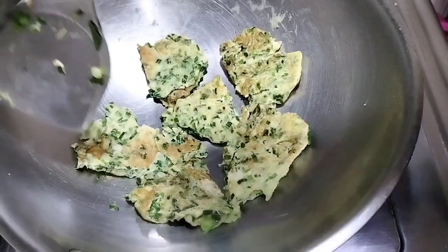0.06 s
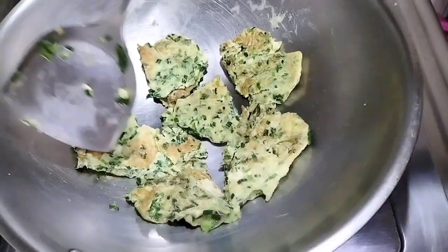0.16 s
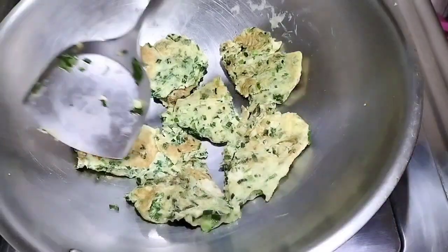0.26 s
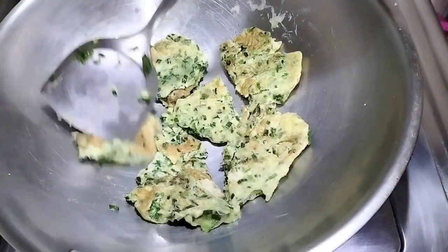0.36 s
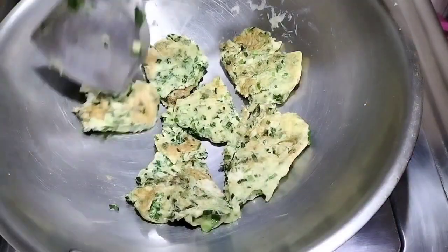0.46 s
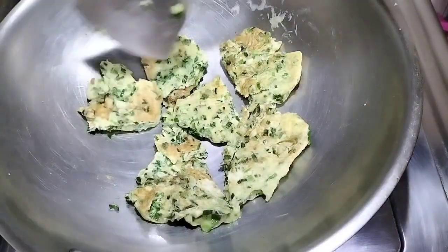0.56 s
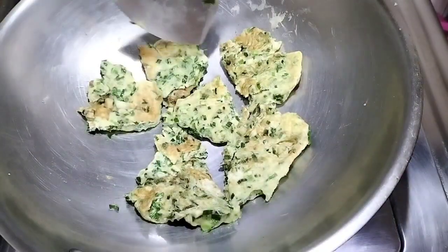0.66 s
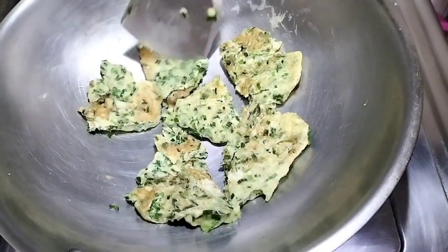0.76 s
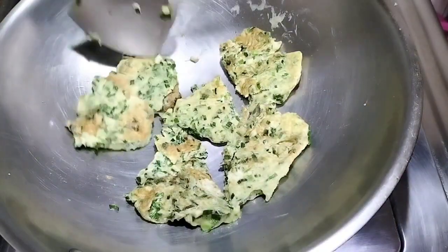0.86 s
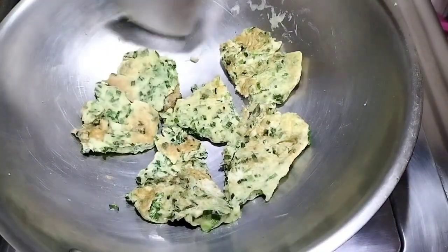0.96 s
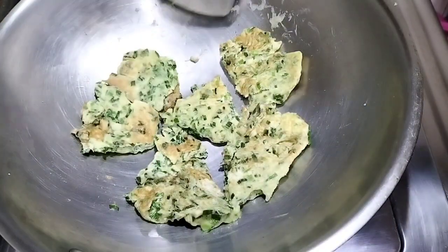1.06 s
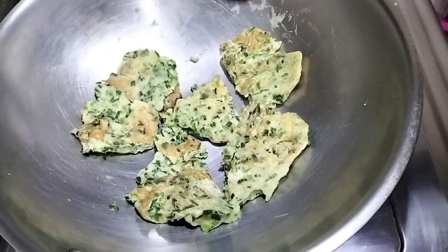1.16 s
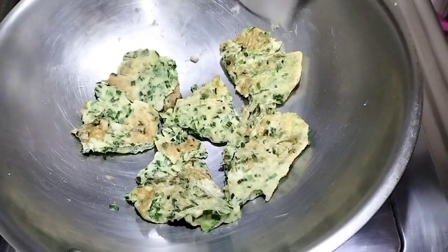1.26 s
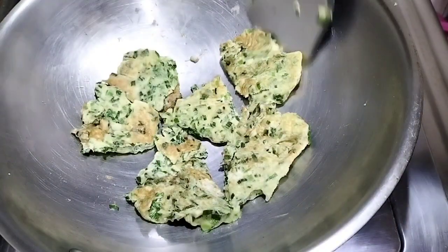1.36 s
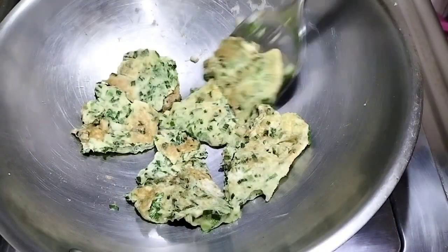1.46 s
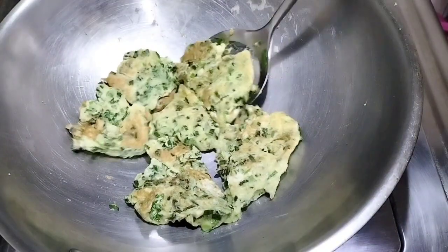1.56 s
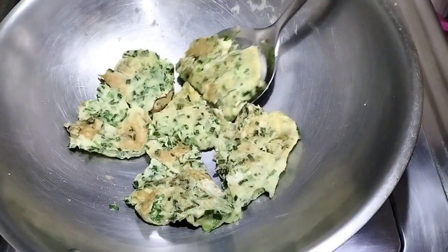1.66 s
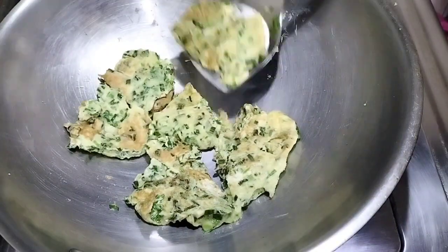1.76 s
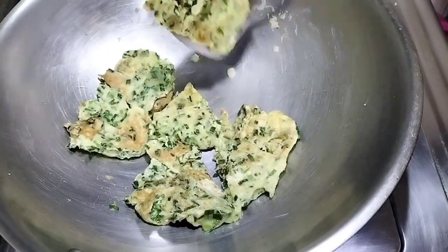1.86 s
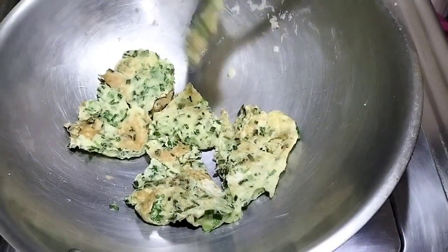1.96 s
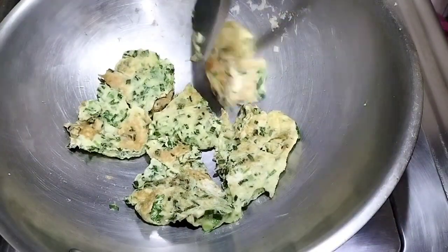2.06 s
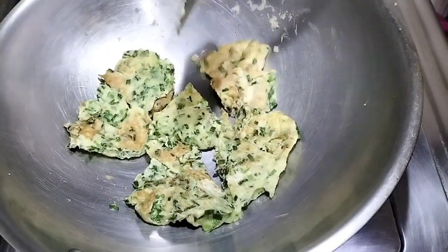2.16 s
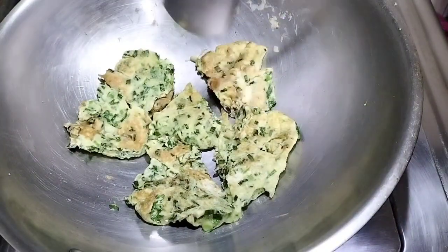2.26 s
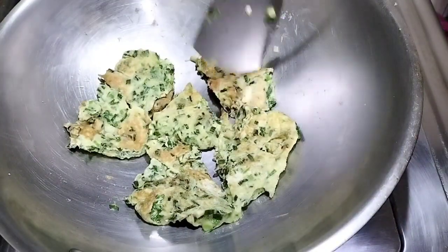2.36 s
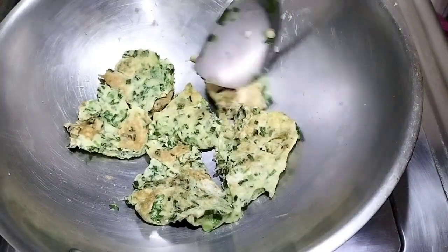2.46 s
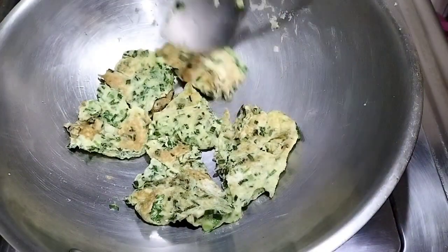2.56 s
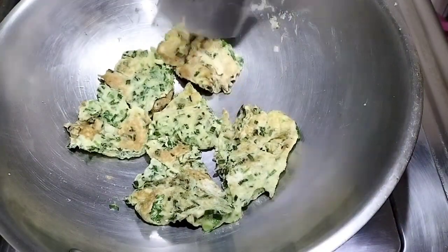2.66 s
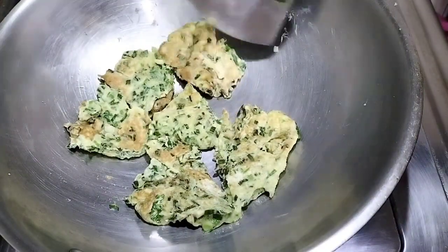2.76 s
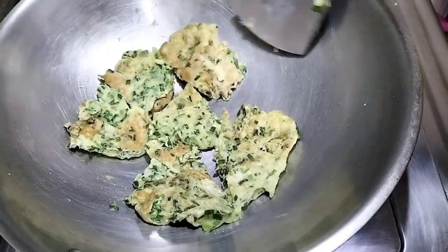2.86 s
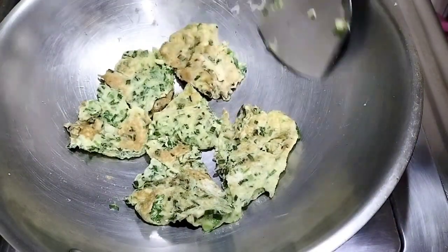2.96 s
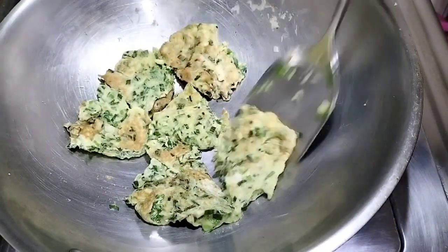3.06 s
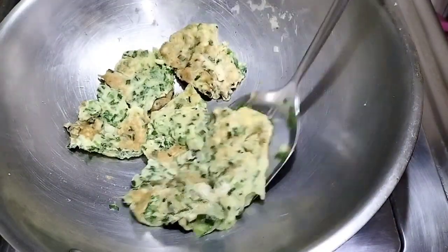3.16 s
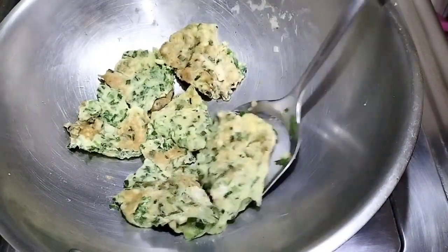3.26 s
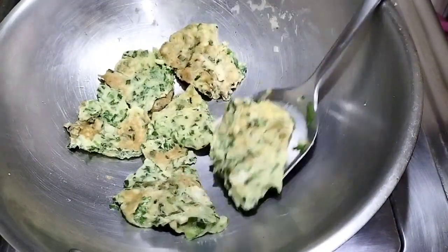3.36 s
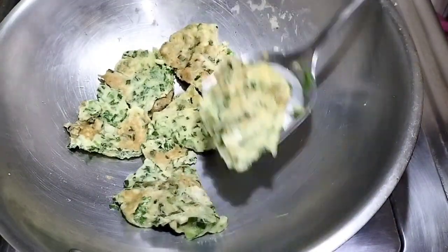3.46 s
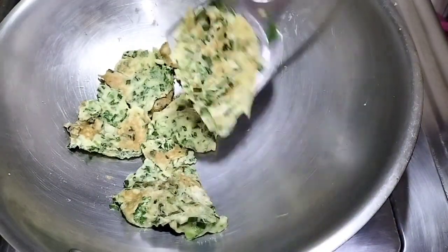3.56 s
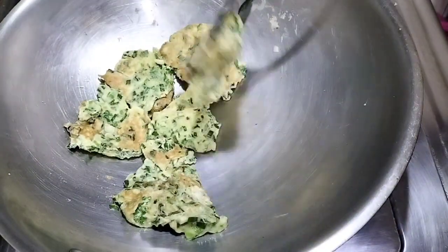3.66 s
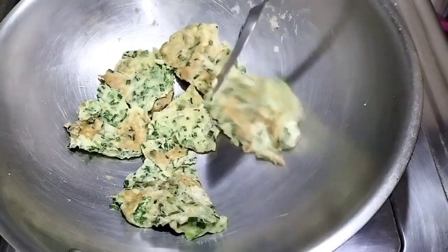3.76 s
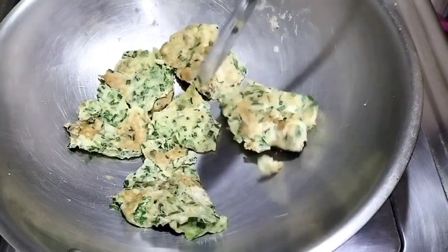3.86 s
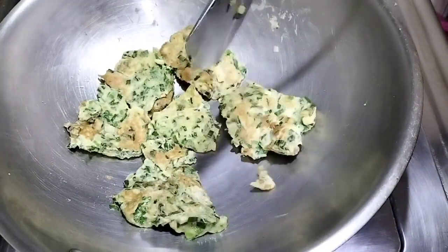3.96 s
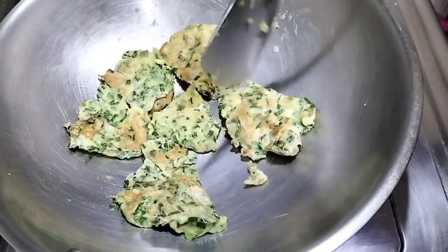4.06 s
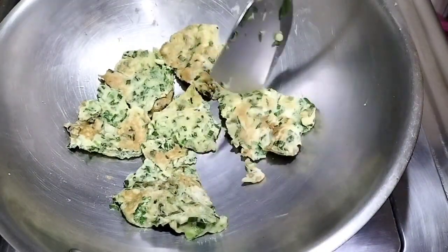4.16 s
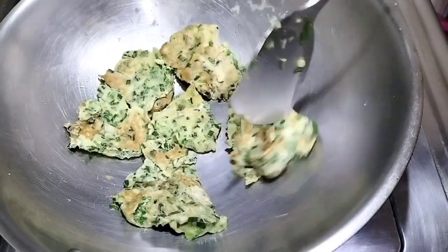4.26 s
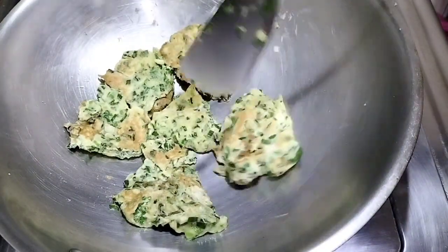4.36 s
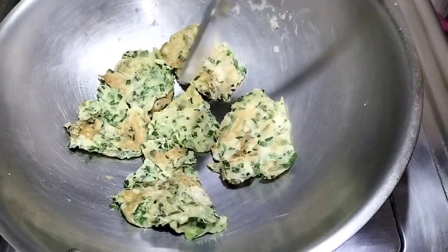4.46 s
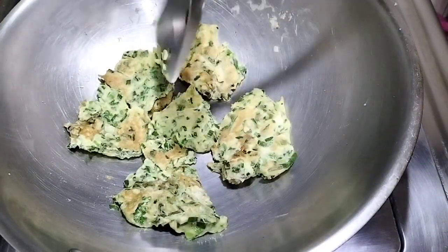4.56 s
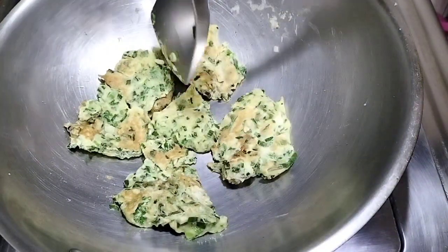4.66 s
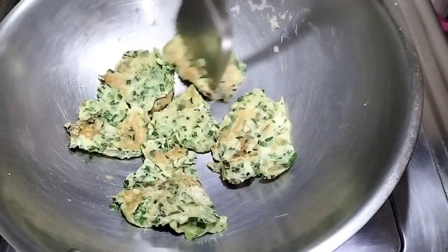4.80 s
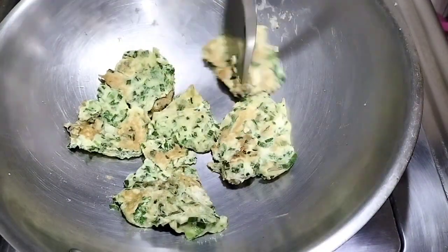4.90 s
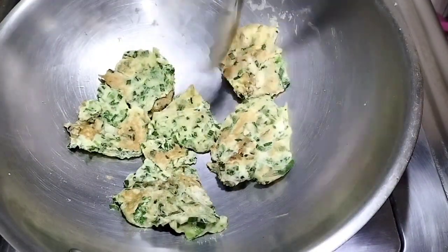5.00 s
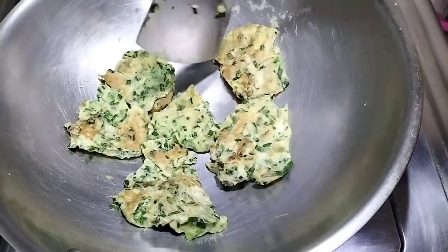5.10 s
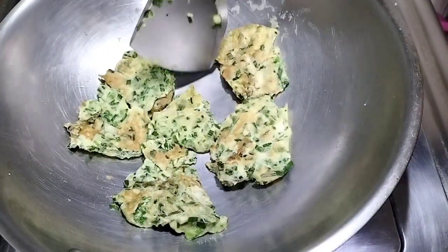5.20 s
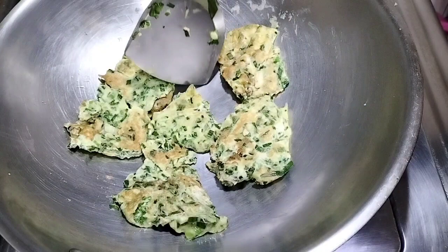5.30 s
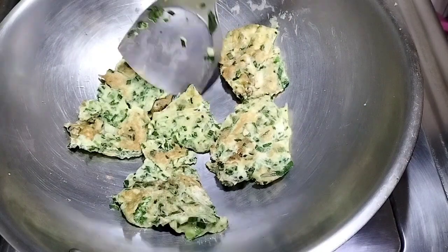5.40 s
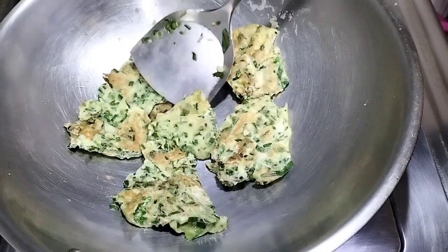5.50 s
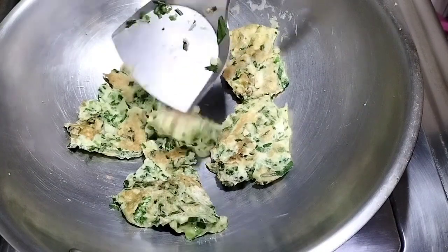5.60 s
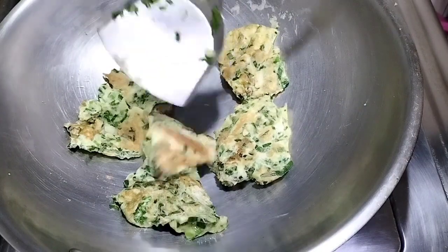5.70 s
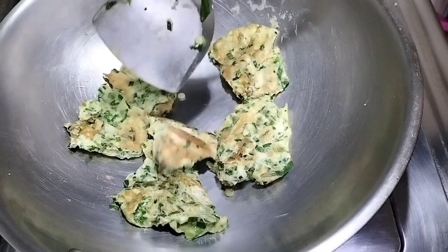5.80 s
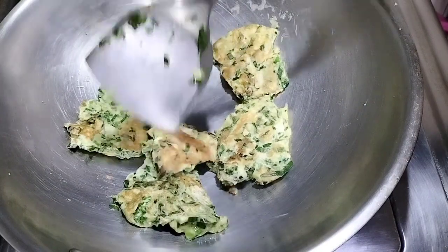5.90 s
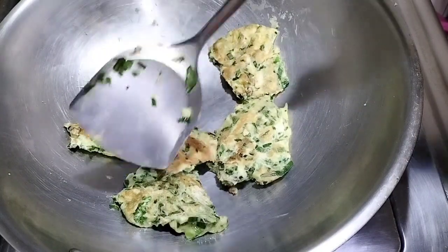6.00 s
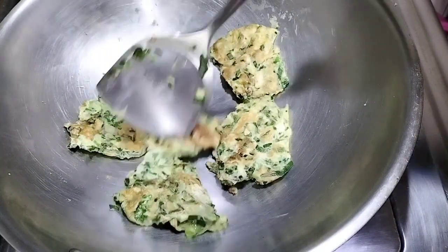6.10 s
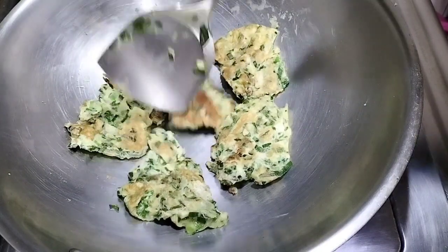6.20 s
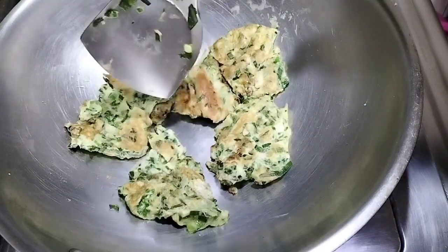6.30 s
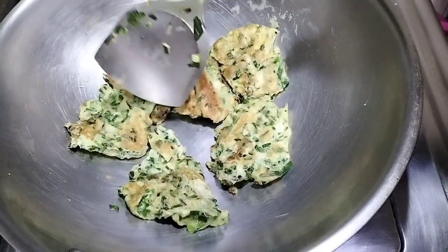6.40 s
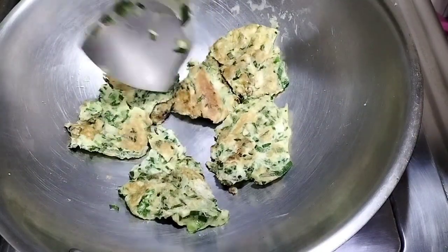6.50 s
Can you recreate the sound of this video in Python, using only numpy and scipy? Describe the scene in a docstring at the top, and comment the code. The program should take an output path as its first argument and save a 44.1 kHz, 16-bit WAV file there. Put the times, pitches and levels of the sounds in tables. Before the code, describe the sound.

Pieces of omelette sizzle quietly in a steel wok, with sharp little spits of oil on top. A steel spatula knocks and scrapes the pan three times, each stroke drawing a brief metallic ring. The sizzle flares as pieces are turned and grows livelier in the second half, strongest near the end. The sound is close and nearly mono, with the faint hush of a small kitchen underneath.

```python
"""Egg frying in a steel wok

A steel spatula strikes and scrapes the wok, and single modes of the bowl sing out as the edge moves.
Egg sizzles in the oil as a mass of bursting bubbles, with sharp spits on top, and flares up when a piece
is turned or pressed. Underneath lies the hush of a small kitchen. The sound is close and nearly mono."""
import sys
import numpy as np
from scipy import signal
from scipy.fft import rfft, irfft, next_fast_len
from scipy.io import wavfile
from scipy.ndimage import uniform_filter1d, map_coordinates

SR = 44100
rng = np.random.default_rng(int(sys.argv[2]) if len(sys.argv) > 2 else 0)


def generate_wav(signal):
    """Clip the signal to [-1, 1] and save it as 16-bit WAV at the path in sys.argv[1]."""
    frames = np.transpose(np.atleast_2d(signal))
    scaled = np.clip(frames, -1, 1) * 32767
    pcm = np.round(scaled).astype(np.int16)
    wavfile.write(sys.argv[1], SR, pcm)


N = 288414

# Room tone of kitchen and burner: frequency_hz, level_db
HUSH_SPECTRUM = [(15, -61), (25, -31), (123, -5), (291, -7.5), (324, -4), (449, -21), (769, -8),
                 (1820, -18.5), (2660, -10), (5370, -18), (5820, -18), (7630, -29), (11200, -23.5),
                 (12000, -26), (12800, -32), (15800, -31)]
# Soft pushes of egg and blade: peak_s, rise_s, fall_s, level_db
SOFT_PUSHES = [(3.961, .01, 0.01, -40.5), (4.279, .06, 0.12, -44.5), (4.575, 0.037, 0.08, -47)]
# Low modes of the wok loaded with egg: pitch_hz, width_hz, level_db
BELLY_MODES = [(186, 21, -8), (330, 32, -8.5), (403, 30, -3), (494, 19, -20)]

# The quiet bed of frying: time_s, level_db, spray_db
SIMMER_CURVE = [(0, -59.5, -7), (.35, -62, -8), (.8, -61, -8), (1.3, -61, 0), (1.85, -57, -10),
                (2.2, -62.5, -6), (2.55, -56.5, -9.5), (3.0, -62, -10), (3.5, -59, -13), (3.86, -66, -8),
                (4.05, -49, -8), (4.5, -49, -3.5), (4.72, -51.5, -4.5), (4.9, -60, -7), (5.3, -54.5, -2.5),
                (5.75, -52, -10), (6.0, -48, -4.5), (6.36, -48, -12), (6.54, -48.5, -7)]
# Flare-ups as wet egg meets hot oil: peak_s, rise_s, fall_s, level_db, hollow_db, spray_db
FLARE_UPS = [(.03, 0.079, 0.08, -46.5, -13, -30), (.166, 0.0065, 0.33, -54, -8.5, -32),
             (.514, 0.044, .07, -43.5, -9, -16.5), (.646, 0.026, 0.01, -52, 7, -15),
             (.73, 0.038, -0.19, -52.5, 0.5, -2), (0.926, .012, 0.01, -33.5, -10, -22),
             (.96, 0.046, 0.31, -46, -3.5, -6.5), (1.075, 0.026, 0, -45.5, 3, -12),
             (1.825, 0.0091, .015, -51, 0, -27), (2.23, 0.0062, 0.03, -44, -9.5, 1),
             (2.315, 0.044, 0.16, -45, -18, -19.5), (2.42, .03, .04, -47.5, -11, -15),
             (2.665, .06, .1, -44.5, -10.5, -15.5), (2.825, 0.12, 0.26, -54, -1.5, -30),
             (3.42, .03, 0.04, -48.5, -17, -39), (3.9, 0.014, 0.2, -44.5, -13, 0),
             (3.944, 0.035, 0.07, -36.5, -10, -6), (4.08, 0.017, 0.22, -45, -21, -5.5),
             (4.215, .015, -0.1, -47, -25, -8), (4.295, 0.032, 0, -41, -21, -12),
             (4.389, 0.025, 0.06, -44.5, -3, -14), (4.575, .04, 0.05, -44.5, -8.5, -9),
             (4.785, 0.022, 0.1, -49.5, -6, -6), (4.968, 0.014, 0.37, -51, -1.5, -6),
             (5.09, .05, .14, -42, -12, -7), (5.205, .015, .04, -49.5, -9, -3),
             (5.36, 0.014, 0.5, -49.5, -6.5, -12), (5.89, 0.023, .04, -43.5, -11.5, -8),
             (5.951, 0.043, 0.02, -41, -15, -3.5), (6.05, 0.0082, 0, -40, -21, -19),
             (6.17, 0.02, .05, -45, -3, -25), (6.299, 0.038, 0.06, -29, -10, -3.5),
             (6.415, 0.057, 0.08, -35, -6.5, -17)]
# Spits of oil: start_s, level_db, hollow_db, spray_db, ping_hz
OIL_SPITS = [(0.0593, -30.5, -14, -24, 2520), (0.1092, -32.5, -15, -30, 2520),
             (0.1653, -29.5, -12, -33, 3170), (0.4241, -40.5, 1.5, -20, 2980),
             (0.6293, -36, -18, -10, 2480), (0.6456, -27, -8.5, -35, 2560), (0.845, -36.5, -10, -22, 2600),
             (0.9218, -17, -35, -28, 3950), (1.033, -37, -14, -26, 3720), (1.067, -23.5, -12, -13, 3670),
             (1.1877, -40, -24, -11, 6000), (1.307, -32.5, -26, -15, 3930),
             (1.8231, -36.5, -12, -29.5, 2420), (2.1284, -38, -28, -15, 3940),
             (2.2233, -30, -29, -12, 4440), (2.3054, -27.5, -34, -32, 3140),
             (2.5202, -36.5, -27, -18, 2580), (2.7809, -31.5, -13, -28, 2530), (2.813, -30, -7, -34, 2670),
             (3.8892, -29.5, -26, -13, 3540), (3.9564, -21, -6.5, -19, 5030),
             (4.0687, -24.5, -21, -8, 5810), (4.0842, -27, -26, -16.5, 3890), (4.2092, -26, -33, -19, 4040),
             (4.345, -33, -22, -27.5, 3480), (4.3864, -22, -19, -23, 2470), (4.4044, -27, -29, -28, 3930),
             (4.4665, -33.5, -27, -7, 3500), (4.5786, -27, -23, -18, 3380), (4.6284, -32.5, -17, -2, 5500),
             (4.7716, -26.5, -18, -24, 6020), (4.8623, -29, -12.5, -30, 4010),
             (4.9255, -26, -29, -23, 3480), (4.9666, -30, -16, -16, 3500), (5.0105, -29, -23, -25, 5460),
             (5.2033, -26.5, -23, -7.5, 5210), (5.3592, -28, -13, -20, 3490),
             (5.691, -30.5, -27, -22.5, 3650), (5.8359, -28, -16, -33, 2900), (5.8845, -26, -19, -10, 3540),
             (5.9404, -24, -25, -31.5, 2840), (5.9898, -28.5, -26, -14, 2890),
             (6.0425, -24.5, -21.5, -32, 3500), (6.1454, -25.5, -15, -31, 3620),
             (6.1776, -20.5, -7.5, -25, 2780), (6.2083, -25, -30, -10, 3460), (6.3924, -18, -17, -20, 2970),
             (6.4183, -20.5, -15, -30, 3930), (6.4312, -16.5, -10, -37, 2510)]
# A spit's send to each frying band: body_db, hollow_db, fizz_db, spray_db
SPIT_SENDS = [-17.5, -10.5, -12.5, -8.5]
# Bright tone of the bubbles: frequency_hz, level_db
SIZZLE_SPECTRUM = [(1000, -21.5), (1700, -10), (2330, -4.5), (2840, 1), (3270, -7), (3590, -3.5),
                   (4880, -4), (6270, -6), (10100, -10), (11000, -13), (11900, -7), (12900, -20),
                   (15800, -16)]
# Hollow midrange that the bowl adds: frequency_hz, level_db
HOLLOW_SPECTRUM = [(350, -24.5), (520, -3.5), (680, -11.5), (950, -1.5), (1080, 1), (1250, -1), (1500, -5),
                   (1900, -20), (2500, -31)]

# Modes of the steel bowl: pitch_hz, base_width_hz, weight_db
WOK_MODES = [(306, 93, -15), (460, 62, -24), (642, 59, -35.5), (854, 34, -36), (955, 73, -28.5),
             (1158, 83, -15), (1225, 31, -28.5), (1348, 32, -21.5), (1857, 77, -38), (2100, 120, -30.5),
             (2486, 98, -36), (3015, 67, -22), (3367, 135, -22), (3553, 140, -18.5), (3707, 81, -27),
             (4030, 157, -14), (4760, 42, -19.5), (5150, 240, -16), (5740, 194, -18), (6100, 150, -23),
             (6870, 100, -23), (8250, 38, -24.5), (8870, 99, -22.5), (9950, 77, -25), (11300, 41, -30.5)]
# The rim's long ring, woken only by blows: pitch_hz, width_hz
RIM_MODE = (172, 2.7)
# The wok shivering on its stand: pitch_hz, width_hz, level_db
STAND_MODE = (133, 70, -15.5)
# Slides of the edge, one curve each: time_s, level_db, low_db, middle_db, top_db
EDGE_SLIDES = [
    [(1.365, -29, -21, -19, -12), (1.373, -16.5, -23, -12, -5), (1.385, -27.5, -5.5, -5, -10),
     (1.465, -25, -7.5, -11, -17), (1.501, -22.5, -12.5, -17, -9.5), (1.515, -28.5, -4.5, -8, -13),
     (1.569, -26, -24.5, -19, -9), (1.699, -32, -16.5, -16.5, -15), (1.79, -58, 8, -18, -10)],
    [(3.043, -26, -35, -1.5, -2), (3.051, -25.5, -14.5, -6.5, -10), (3.103, -40.5, -3.5, -17, -9),
     (3.143, -25.5, -38, -7, -16), (3.175, -23, -9, -4.5, -15), (3.225, -24.5, -18, -33.5, -9.5),
     (3.359, -27.5, -29, -11.5, -30), (3.46, -58.5, -1, -15, -50)],
    [(5.466, -15.5, -27, -3.5, -18), (5.494, -22, -11, -17, -22), (5.536, -37.5, -5, -5, -18),
     (5.554, -30.5, -16, -15, -26), (5.59, -28.5, -14, 1.5, -37), (5.64, -39.5, -8, 0, -16),
     (5.668, -48, -4, 1, -6), (5.7, -54, -13, -7, -7)],
]
# Blows of the edge: start_s, strength_db, low_db, middle_db, top_db, contact_s
EDGE_BLOWS = [(1.3698, -6.5, -12, -3.5, -15, 0.0037), (1.4818, -11, -23, -28, -11, 0.005),
              (1.5334, -17, -15, -21, -27, 0.0047), (1.584, -15.5, -30, -9, -22, 0.0054),
              (1.6251, -17.5, -32, -28, -21, .0055), (3.046, -28.5, -30, -8, -12, 0.0027),
              (3.0596, -12, -32, -16, -25, 0.0036), (3.0792, -22, -24, -17, -17, .0046),
              (3.1711, -4.5, -19.5, -16, -12, 0.01), (3.2839, -14, -24.5, -11.5, -24, 0.0092),
              (5.465, -5.5, -14.5, 5, -1, 0.0036), (5.551, -16.5, -28, -5, -27, 0.0072)]
# Friction too fine to ring a single mode: frequency_hz, level_db
RASP_SPECTRUM = [(59, -66), (100, -52), (469, -13.5), (673, -38), (1170, -4.5), (1670, -17), (2110, -6),
                 (4070, 0), (4530, -4), (8000, -14.5), (11500, -21.5), (15800, -30)]
# The finest scratches of the edge: frequency_hz, level_db
GRIT_SPECTRUM = [(6500, -38), (8000, -2), (10500, -1.5), (13000, -7), (14800, -10), (15800, -7)]
# Single tones of the wok, ringing from scrapes, blows, soft pushes and frying:
# peak_s, rise_s, fall_s, pitch_hz, level_db
WOK_TONES = [(1.372, .004, .011, 5880, -29), (1.374, 0.0046, 0.017, 4018, -29),
             (1.377, 0.0074, .05, 2390, -29.5), (1.392, 0.0097, 0.0092, 1238, -29.5),
             (1.414, .037, .039, 2558, -31.5), (1.424, 0.039, 0.035, 6907, -37),
             (1.442, 0.061, .044, 325, -38), (1.445, .012, 0.02, 4058, -30.5),
             (1.449, 0.069, .25, 471, -45), (1.489, .024, 0.029, 5850, -33.5),
             (1.496, 0.0092, 0.015, 4015, -22.5), (1.509, 0.0083, .028, 4813, -30.5),
             (1.518, 0.018, .009, 1162, -32), (1.537, .017, .037, 5098, -33),
             (1.541, .012, .048, 3240, -40), (1.58, 0.073, 0.028, 4143, -32),
             (1.586, 0.0076, 0.022, 2920, -31), (1.659, .009, 0.055, 2950, -37),
             (1.459, .022, 0.055, 958, -41.5), (1.689, 0.034, 0.052, 848, -43.5),
             (1.712, 0.0066, 0.0073, 179, -46), (3.053, .004, 0.0069, 3560, -27.5),
             (3.06, 0.0048, 0.035, 1176, -36.5), (3.17, .017, .025, 4920, -31),
             (3.063, .015, 0.021, 3934, -28), (3.135, 0.04, 0.017, 3920, -32.5),
             (3.175, .006, 0.0062, 2520, -22), (3.18, 0.01, 0.0073, 3750, -21),
             (3.183, 0.0051, .011, 5160, -20), (3.185, 0.0064, 0.0071, 347, -27.5),
             (3.188, 0.012, 0.049, 4165, -27.5), (3.233, .014, 0.023, 5090, -29),
             (3.259, 0.12, .07, 464, -44.5), (3.282, 0.073, 0.073, 2968, -32),
             (3.285, 0.044, 0.092, 3330, -35.5), (3.3, 0.064, 0.032, 6840, -43.5),
             (3.3, .05, 0.052, 5070, -38.5), (3.322, 0.033, 0.087, 2095, -44),
             (3.338, 0.064, 0.039, 1839, -38.5), (3.357, .072, .041, 4092, -38.5),
             (3.452, 0.012, 0.029, 2130, -54), (3.961, .005, .009, 496, -41),
             (4.285, 0.06, 0.049, 398, -41.5), (5.532, .027, .017, 1165, -37.5),
             (5.56, .023, 0.021, 6300, -41.5), (5.473, 0.0068, 0.0058, 1246, -16),
             (5.475, 0.0085, .016, 2140, -30), (5.477, 0.011, 0.02, 2993, -20),
             (5.48, .01, 0.024, 3736, -27.5), (5.561, .078, 0.026, 2780, -37),
             (5.59, .022, 0.026, 2180, -37), (5.591, 0.028, 0.027, 1154, -31.5),
             (5.95, 0.072, 0.09, 2895, -51), (6.1, .2, 0.1, 3564, -51)]

# Stereo width, side against mid: frequency_hz, side_db
STEREO_WIDTH = [(3000, -94), (7000, -53.5), (11800, -21), (12600, -5), (15000, -10)]
# A gentle low-bass roll-off, otherwise nearly flat: frequency_hz, gain_db
BASS_ROLL_OFF = [(40, -4.5), (110, -1), (11000, 0), (11900, -0.5), (12600, 0)]
# Crossovers for the sizzle's body, fizz and spray, one curve each: frequency_hz, gain_db
SIZZLE_BANDS = [[(3900, 0), (4400, -3), (5400, -30)],
                [(3400, -30), (4400, -3), (4900, 0), (6500, 0), (7500, -3), (9500, -30)],
                [(5500, -30), (7500, -3), (8500, 0)]]
# Splits between the wok's low, middle, centre, high and top modes: frequency_hz
MODE_SPLITS = [750, 1600, 4400, 7500]

FIZZ_DB, FIZZ_FOLLOWS = 2, 0.49  # the fizz follows this share of the spray's dB
HIGH_DB, HIGH_FOLLOWS = 1.9, 0.36  # the high modes follow this share of the top modes' dB


def amp(db):
    """dB to gain."""
    return 10 ** (np.asarray(db) / 20)


def unit(x):
    """x at rms 1."""
    return x / np.sqrt(np.mean(x ** 2) + 1e-20)


def automation(curves):
    """A soft gate, open during the curves, and a per-sample lane for each column after time."""
    rows = np.concatenate(curves)
    t = np.arange(N) / SR
    lanes = [np.interp(t, rows[:, 0], column) for column in rows.T[1:]]
    inside = sum((t >= curve[0][0]) & (t <= curve[-1][0]) for curve in curves)
    return uniform_filter1d(1. * inside, size=80), lanes


def swell_db(peak_s, rise_s, fall_s, shape):
    """A swell, 10 dB down one rise before and one fall after its peak; each takes at least 1 ms."""
    t = np.arange(N) / SR - peak_s
    return -10 * abs(t / np.where(t < 0, max(rise_s, 1e-3), max(fall_s, 1e-3))) ** shape


def burst(start_s, samples):
    """An event's slice of the timeline and its own clock in seconds."""
    first = round(start_s * SR)
    at = slice(first, min(N, first + samples))
    return at, np.arange(at.stop - at.start) / SR


def wobble(rate_hz):
    """Smooth random modulation."""
    steps = np.arange(0, N + 32, 32)
    knots = rng.standard_normal(int(N * rate_hz / SR) + 5)
    return np.interp(np.arange(N), steps, map_coordinates(knots, [steps * rate_hz / SR]))


def eq(x, points):
    """x through a curve of (Hz, dB) points on a log frequency axis."""
    size = next_fast_len(N + 8192)
    hz, db = np.transpose(points)
    gain_db = np.interp(np.log(np.fft.rfftfreq(size, 1 / SR) + 1), np.log(hz + 1), db)
    return irfft(rfft(x, size) * amp(gain_db), size)[:N]


def patchy_noise(depth_db):
    """White noise whose loudness drifts in small patches of time and pitch."""
    spectrum = signal.stft(rng.standard_normal(N), nperseg=256)[2]
    patches = uniform_filter1d(rng.standard_normal(spectrum.shape), size=3, axis=0)
    patches = uniform_filter1d(patches, size=12, axis=1)
    return unit(signal.istft(spectrum * amp(depth_db * unit(patches)), nperseg=256)[1][:N])


def grains(per_s, spread_db):
    """Random ticks at rms 1, mostly tiny with a few big ones."""
    ticks = (rng.random(N) < per_s / SR) * rng.standard_normal(N)
    return unit(ticks * amp(spread_db * rng.standard_normal(N)))


def mode(x, hz, width_hz):
    """A resonator, at least 4 Hz wide, that keeps the power of white noise."""
    r = np.exp(-np.pi * max(width_hz, 4) / SR)
    ring = signal.lfilter([1, 0, -1], [1, -2 * r * np.cos(2 * np.pi * hz / SR), r * r], x)
    return np.sqrt(1 - r * r) * ring / (np.sqrt(2) * r)


def steep_mode(x, hz, width_hz):
    """A resonator applied twice: same power, darker valleys beside it."""
    return mode(mode(x, hz, width_hz), hz, width_hz) * np.sqrt(2 * np.pi * width_hz / SR)


def kitchen_hush(level_db=-61):
    """Kitchen and burner: a dark, gently wavering bed of noise."""
    return amp(level_db + wobble(5.27)) * unit(eq(rng.standard_normal(N), HUSH_SPECTRUM))


def kitchen_reverb(x, t60_s=0.18):
    """A short tail from close hard walls."""
    t = np.arange(SR // 3) / SR
    tail = rng.standard_normal(len(t)) * amp(-60 * t / t60_s) * (t > .004)
    return signal.fftconvolve(x, tail / np.linalg.norm(tail))[:N]


def wok_belly(x):
    """The low, damped ring of the loaded wok."""
    return sum(amp(db) * np.sqrt(width) * mode(x, hz, max(width, 35)) for hz, width, db in BELLY_MODES)


def pushes():
    """Egg and blade rub softly and unevenly, stirring only the lowest modes."""
    level = sum(amp(db + swell_db(peak, rise, fall, shape=2.15)) for peak, rise, fall, db in SOFT_PUSHES)
    rubbing = amp(2.4 * wobble(45)) * rng.standard_normal(N)
    return wok_belly(level * rubbing) / wok_belly(rubbing).std()


def frying_bands_db(hollow_db, spray_db):
    """Balance of the frying bands, one row each: body, hollow, fizz, spray."""
    fizz_db = FIZZ_DB + FIZZ_FOLLOWS * spray_db
    return np.reshape(np.broadcast_arrays(0, hollow_db, fizz_db, spray_db), (4, -1))


def bubbles(spurts_per_s=40, spurt_decay_s=0.0059):
    """Dense bursting bubbles in four bands, riding the simmer, the flare-ups and small random spurts."""
    _, (simmer_db, simmer_spray_db) = automation([SIMMER_CURVE])
    power = amp(2 * (simmer_db + frying_bands_db(hollow_db=-9.5, spray_db=simmer_spray_db)))
    for peak, rise, fall, db, hollow_db, spray_db in FLARE_UPS:
        flare_db = db + swell_db(peak, rise, fall, shape=1.46)
        power += amp(2 * flare_db) * amp(2 * frying_bands_db(hollow_db, spray_db))
    kicks = (rng.random(N) < spurts_per_s / SR) * 1.33 * rng.random(N)
    spurts = 1 + signal.lfilter([1], [1, -np.exp(-1 / (spurt_decay_s * SR))], kicks)
    flicker = amp(1.22 * wobble(30) - 7)
    crackle = unit(patchy_noise(depth_db=2.87) + .5 * grains(per_s=1200, spread_db=5.9))
    return spurts * flicker * crackle * np.sqrt(power)


def spits(t60_s=0.048, ping_db=-11):
    """Oil spits: a click and a short splash in the four bands and, separately, a brief ping."""
    splashes, pings = np.zeros((4, N)), np.zeros(N)
    for start, db, hollow_db, spray_db, hz in OIL_SPITS:
        at, t = burst(start, samples=4000)
        fade = amp(-60 * t / t60_s) * (1 - np.exp(-t / 0.00033))
        click = 3 * np.exp(-t / 0.000073)
        sends = amp(db + np.c_[SPIT_SENDS] + frying_bands_db(hollow_db, spray_db))
        splashes[:, at] += sends * (fade * rng.standard_normal(len(t)) + click)
        pings[at] += amp(db + ping_db) * fade * np.sin(2 * np.pi * hz * t)
    return splashes, pings


def frying():
    """Bubbles and spits sizzle brightly, sound hollow in the bowl and ring the steel under the oil."""
    bubbling = bubbles()
    splashes, pings = spits()
    body, hollow, fizz, spray = bubbling + splashes
    white = rng.standard_normal(N)  # level reference for the filters
    tinted = eq(white, SIZZLE_SPECTRUM)
    bands = sum(eq(x, band) / eq(tinted, band).std() for x, band in zip([body, fizz, spray], SIZZLE_BANDS))
    bowl = eq(hollow, HOLLOW_SPECTRUM) / eq(white, HOLLOW_SPECTRUM).std()
    bowl += amp(-7) * steep_mode(hollow, hz=943, width_hz=160)  # air in the bowl
    steel = np.zeros(N)
    for hz, width, db in WOK_MODES:
        if 2300 < hz < 7500:
            drive = (fizz if hz > 4400 else body) * amp(8.1 * np.tanh(wobble(6.1)))
            steel += amp(0.53 * db) * mode(drive, hz, 0.73 * width)
    return eq(bands, SIZZLE_SPECTRUM) + bowl + amp(-5) * steel + pings


def wok_tones():
    """Single tones of the wok swell and fade, fluttering in strength and phase."""
    sound = np.zeros(N)
    flutter, drift = amp(2.5 * wobble(110)), .9 * wobble(70)
    for peak, rise, fall, hz, db in WOK_TONES:
        at, t = burst(peak - .25, samples=SR // 2)
        envelope = np.sqrt(2) * amp(db + swell_db(peak, rise, fall, shape=3.03)[at])
        offset = rng.integers(N - SR)  # each tone wavers in its own way
        own = slice(offset, offset + len(t))
        sound[at] += envelope * flutter[own] * np.sin(2 * np.pi * hz * t + drift[own])
    return sound


def mode_sends(low_db, middle_db, top_db):
    """Gains into the wok's mode groups, one row each: low, middle, centre, high, top."""
    high_db = HIGH_DB + HIGH_FOLLOWS * top_db
    return amp(np.broadcast_arrays(low_db, middle_db, 0, high_db, top_db)).reshape(5, -1)


def slides():
    """Grainy friction of steel sliding on steel, sent to the five mode groups."""
    touch, (level_db, low_db, middle_db, top_db) = automation(EDGE_SLIDES)
    pressure = touch * amp(level_db + 0.61 * wobble(40))
    friction = unit(patchy_noise(depth_db=0.5) + 0.5 * grains(per_s=1500, spread_db=4))
    return pressure * friction * mode_sends(low_db, middle_db, top_db)


def blows(rim_db=-34):
    """The edge strikes: a noise burst for the five mode groups and a faint knock for the rim."""
    hits, knocks = np.zeros((5, N)), np.zeros(N)
    for start, db, low_db, middle_db, top_db, contact_s in EDGE_BLOWS:
        at, t = burst(start, samples=2000)
        envelope = amp(db - 4) * np.exp(-t / contact_s) * (1 - np.exp(-t / 0.00043))
        hits[:, at] += mode_sends(low_db, middle_db, top_db) * envelope * rng.standard_normal(len(t))
        knocks[at] += amp(db + rim_db) * np.exp(-t / 0.0005)
    return hits, knocks


def wok_ring(drive):
    """The bowl's main modes, each swelling and fading as the contact moves over its shape."""
    pitches_hz, _, weights_db = np.transpose(WOK_MODES)
    groups = np.searchsorted(MODE_SPLITS, pitches_hz)
    power = amp(2 * weights_db)
    shares = np.sqrt(power / np.bincount(groups, power)[groups])
    ring = np.zeros(N)
    for (hz, width, _), group, share in zip(WOK_MODES, groups, shares):
        coupling = amp(3.5 * np.tanh(wobble(26)))
        ring += share * steep_mode(drive[group] * coupling, hz, 2 * width)
    return ring


def steel_shimmer(x, count=110, t60_s=0.06):
    """The many weak modes of thin steel, at random pitches, all dying quickly."""
    t = np.arange(SR // 8) / SR
    hz = rng.uniform(1492, 15500, (count, 1))
    gains = amp(4 * rng.standard_normal((count, 1)))
    ring = (gains * np.sin(2 * np.pi * hz * t)).sum(axis=0) * amp(-60 * t / t60_s)
    return signal.fftconvolve(x, ring / np.linalg.norm(ring))[:N]


def spatula():
    """Slides and blows ring bowl, rim and stand; rasp and grit give the scrape its bite."""
    friction = slides()
    hits, knocks = blows()
    low, middle, centre, high, top = friction + hits
    top *= amp(-5)
    stand_hz, stand_width_hz, stand_db = STAND_MODE
    stand = amp(stand_db) * steep_mode(low, stand_hz, stand_width_hz)
    ring = wok_ring([low, middle, centre, high, top]) + mode(knocks, *RIM_MODE) + stand
    rasp = eq(centre + high, RASP_SPECTRUM) / eq(rng.standard_normal(N), RASP_SPECTRUM).std()
    grit = eq(top, GRIT_SPECTRUM)
    return amp(-6) * ring + amp(-25.5) * rasp + amp(-13.5) * steel_shimmer(rasp) + grit


def scene():
    """Everything sits in the centre; only the top treble spreads to the sides."""
    wok = spatula() + wok_tones() + frying() + pushes()
    mid = wok + kitchen_hush() + amp(-9) * kitchen_reverb(wok)
    scatter = rng.standard_normal(600)
    side = eq(signal.fftconvolve(mid, scatter / np.linalg.norm(scatter), "same"), STEREO_WIDTH)
    return np.array([mid + side, mid - side])


def record(dry):
    """A soft ceiling on the peaks, a gentle low-bass roll-off and a steep high cut."""
    ceiling, cutoff_hz = .72, 15850
    high_cut = [(cutoff_hz - 60, 0), (cutoff_hz + 60, -60), (cutoff_hz + 700, -70)]
    rounded = dry / (1 + abs(dry / ceiling) ** 4) ** .25
    return np.array([eq(eq(channel, BASS_ROLL_OFF), high_cut) for channel in rounded])


dry = scene()
out = record(dry)
generate_wav(out)
```